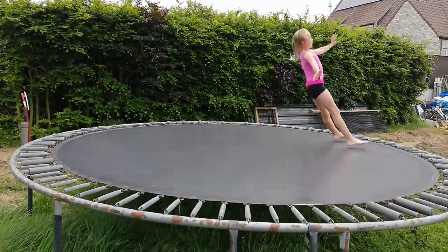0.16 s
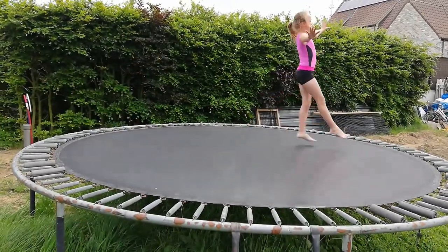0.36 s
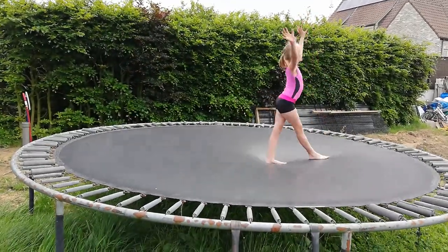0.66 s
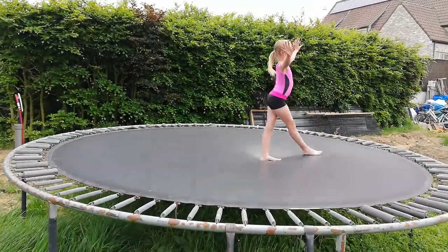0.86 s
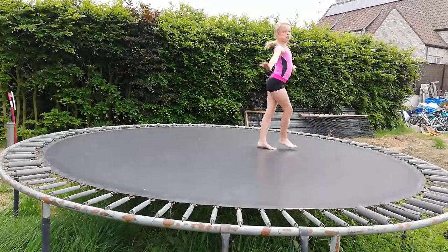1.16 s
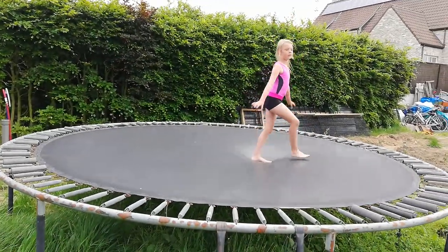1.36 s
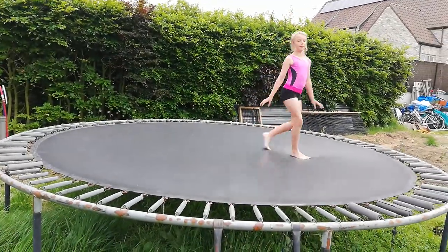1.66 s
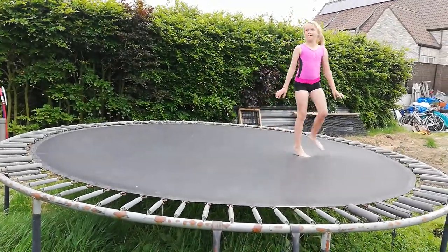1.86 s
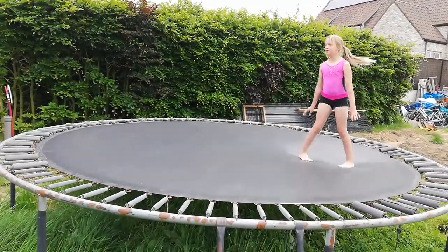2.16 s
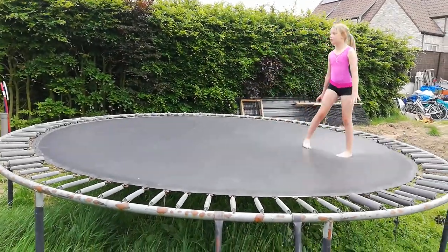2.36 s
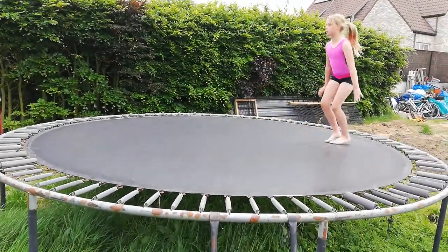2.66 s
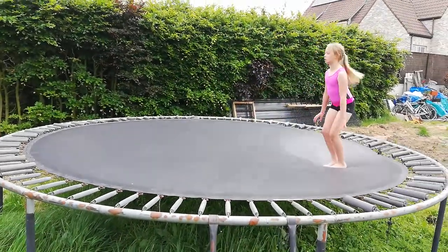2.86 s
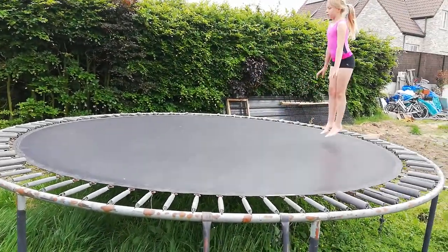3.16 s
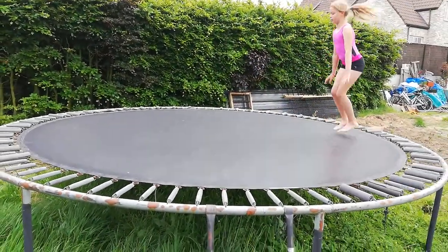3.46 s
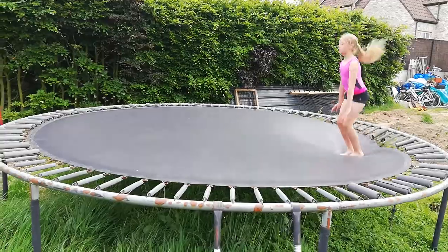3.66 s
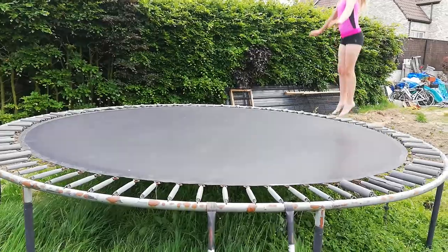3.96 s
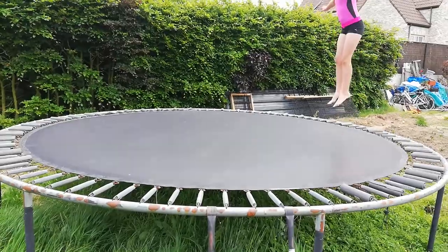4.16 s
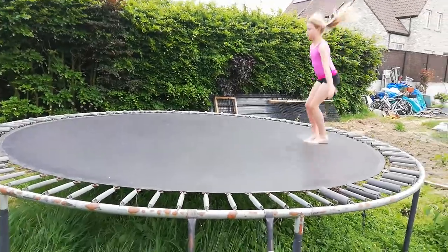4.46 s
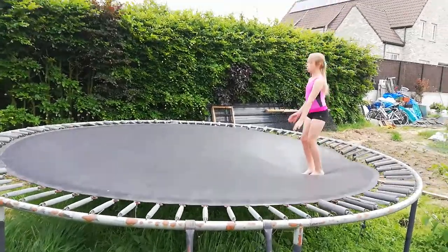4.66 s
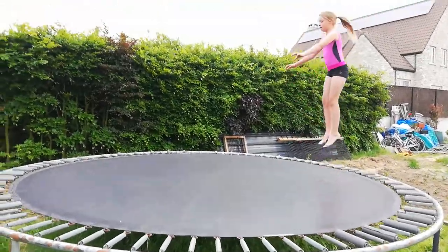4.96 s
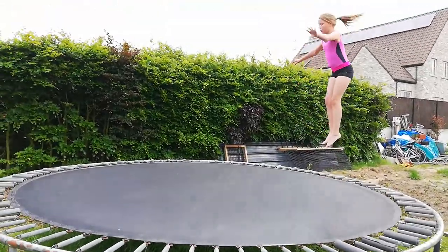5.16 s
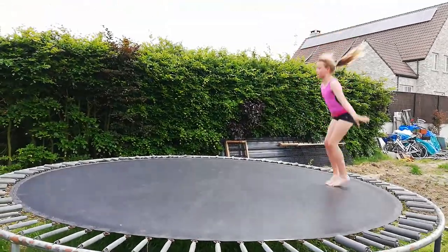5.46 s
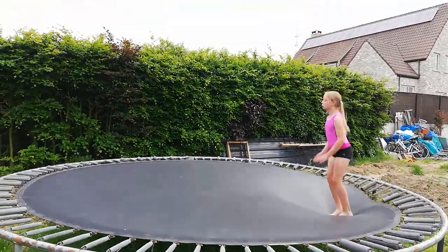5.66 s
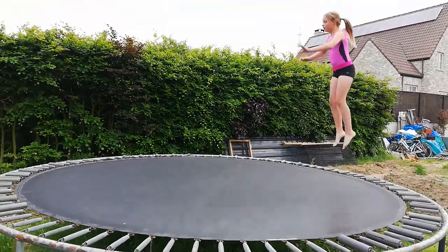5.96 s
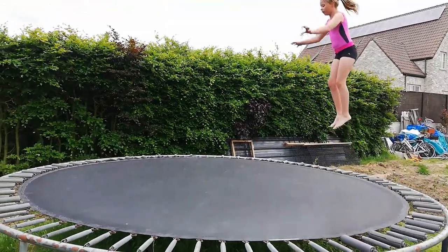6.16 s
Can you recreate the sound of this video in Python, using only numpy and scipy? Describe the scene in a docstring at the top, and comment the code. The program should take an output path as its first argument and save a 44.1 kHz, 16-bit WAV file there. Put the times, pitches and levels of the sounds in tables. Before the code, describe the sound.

In a breezy garden, trampoline springs rasp once, then give a few light metallic ticks while a distant bird whistles. The bouncing settles into a regular rhythm of scraping, ringing coils on the right. Wind buffets the microphone in uneven low bursts, building to a strong, popping gust near the end, just as the bird sings louder, gliding and trilling. Leaves and far traffic hiss quietly throughout.

```python
"""Garden trampoline in a breeze

A phone's stereo microphone stands in a gusty garden, a child bouncing on a trampoline to its right.
At each bounce the steel springs rasp, coil on coil, and slipping hooks tick and ring on the frame.
A songbird whistles in the hedge, also on the right, first from a farther perch, then a nearer one.
Wind eddies buffet the microphone ports; leaves and far traffic hiss behind."""
import sys
import numpy as np
from scipy import signal
from scipy.fft import rfft, irfft, next_fast_len
from scipy.io import wavfile
from scipy.ndimage import uniform_filter1d

SR = 44100
rng = np.random.default_rng(int(sys.argv[2]) if len(sys.argv) > 2 else 0)


def to_wav(sig):
    """Store sig (one row per channel, or 1-D mono) as 16-bit WAV at the path in sys.argv[1].

    Samples outside -1..1 are clipped; the rate is SR.
    """
    pcm = np.clip(np.atleast_2d(sig), -1, 1) * 32767
    pcm = np.round(pcm).astype(np.int16)
    wavfile.write(sys.argv[1], SR, pcm.T)  # frames by channels


N = 277830

# Modes of one coil spring: f/Hz, relative level/dB, t60/s
COIL_MODES = [(1252, -4, 0.098), (2752, 1, 0.15), (3307.4, -3, 0.15), (3455, -3.5, 0.94), (3500, -6, 0.27),
              (4720, 2.5, 0.089), (4760, -36, 0.063), (6420, -1.5, 0.056), (7830, -4, 0.079),
              (9000, -40, .06), (9420, -8.5, 0.19), (9880, -8, 0.15), (12300, -19, 0.055)]


def springs():
    """The trampoline, off to the right: springs rasp as the mat sinks and throws back; lone hooks tick."""
    # Strokes of the mat: t/s, swell/s, sag/s, first, peak and last level/dB, treble/dB, low clank/dB
    strokes = [(0.0, 0.0098, 0.058, -33.5, -32, -35.5, 2, 3), (.08, 0.011, 0.14, -41, -33, -43.5, -2, 6.5),
               (2.184, 0.094, 0.019, -45, -39.5, -45.5, 7.5, 4),
               (2.855, 0.031, 0.016, -47, -43, -44.5, 7, -6), (3.054, .01, 0.082, -48.5, -44.5, -46, 1, 8),
               (3.654, 0.054, 0.086, -47, -33, -44, 1.5, 3.5),
               (3.81, 0.027, 0.096, -39, -34, -42.5, 1.5, 0.5), (4.585, .095, .02, -41, -39, -40, 3, 2.5),
               (4.73, .035, .105, -41.5, -36.5, -47, 1.5, 4), (4.893, 0.0098, 0.074, -40, -38, -47, 5, 4.5),
               (5.6, 0.073, 0.039, -43.5, -31, -39.5, 6, 3.5),
               (5.73, .11, 0.0093, -39.5, -38, -41.5, 3.5, 6.5)]
    # Hook slips: t/s, scrape level/dB, scrape t60/s (capped at 0.6), treble/dB, ring level/dB, ring f/Hz
    hook_slips = [(0.0792, -37.5, 0.2, 17.5, -37, 3470), (0.3306, -39, 0.07, 6, -38.5, 3714),
                  (0.7125, -42, 0.087, 1, -43, 3440), (0.7615, -39, 0.11, 5.5, -39, 3500),
                  (1.4068, -47, 0.17, 2.5, -39.5, 3455), (1.5118, -45, 0.18, 4.5, -39, 3490),
                  (2.1886, -35, 0.09, -14, -34, 3490), (2.5046, -48, 0.08, 14.5, -54, 3420),
                  (2.8644, -41, 0.15, -4, -54, 3700), (3.1389, -45.5, 0.89, -21, -35, 3173),
                  (3.6472, -46.5, 0.14, 19.5, -56, 3420), (3.9054, -37, 0.13, 10, -49, 3400),
                  (3.9796, -45.5, 0.087, 14, -41, 3490), (4.0272, -40.5, 0.16, 7, -46, 3700),
                  (4.6445, -31.5, 0.13, -3, -39, 3350), (4.8196, -34, 0.16, 7, -60, 3330),
                  (4.8633, -43, 0.088, 14.5, -50.5, 3600), (4.8923, -51, 0.076, 8, -56, 3340),
                  (4.9594, -46.5, 0.06, 14, -50, 3260), (5.5547, -41.5, 0.087, 6, -40, 3404),
                  (5.592, -39, 0.12, 9, -30, 3920), (5.8967, -41, 0.29, 5, -40.5, 3690),
                  (5.9574, -40.5, 0.25, 9, -56, 3600), (6.0566, -54.5, 0.2, 17, -55, 3820)]
    out = np.zeros((2, N))
    for row in strokes:
        add(out, *spring_stroke(*row))
    for start, *slip in hook_slips:
        add(out, start - .003, hook_tick(*slip))
    return out + gain_of([[-17], [-13]]) * garden_echo(out[1], t60=0.2)


def spring_stroke(start, swell, sag, first_db, peak_db, last_db, treble_db, clank_db):
    """All the springs rasp together, swelling and sagging with the load. Returns onset time and sound."""
    attack_s, release_db_per_s = .015, 450
    length = swell + sag
    t = np.arange(-min(attack_s, start), length + 30 / release_db_per_s, 1 / SR)
    load_db = np.interp(t, [0, swell, length], [first_db, peak_db, last_db])
    clank_db = clank_db - 0.55 * (load_db - min(first_db, last_db))  # the low clank swells less
    judder_db = 1.6 * drift(len(t), .004)  # hooks catch and let go in clumps
    rasp = coil_rasp(len(t), ring_db=-2.5, grain_db=0.5, slips_per_s=350)
    rasp = place_steel(rasp, treble_db, clank_db)
    attack = np.minimum(1 + t / attack_s, 1) ** 2
    release = gain_of(-release_db_per_s * np.maximum(t - length, 0))
    return start + t[0], rasp * gain_of(load_db + judder_db) * attack * release


def hook_tick(scrape_db, scrape_t60, treble_db, ring_db, ring_hz):
    """A hook scrapes, then rattles on its seat; each knock rings three close modes of the coil."""
    knocks_per_s, rattle_t60, knock_t60 = 300, .35, .12
    t = np.arange(SR // 6) / SR
    scrape = coil_rasp(len(t), ring_db=-2.0, grain_db=-2.0, slips_per_s=600)
    scrape = place_steel(scrape, treble_db, clank_db=1.4)
    scrape *= gain_of(scrape_db - 60 * t / np.clip(scrape_t60, .03, .6))
    knocks = (rng.random(len(t)) < knocks_per_s / SR) * rng.standard_normal(len(t)) + (t == 0)
    knocks *= gain_of(-60 * t / rattle_t60)
    modes = COIL_MODES[2:5]
    ring = coil_ring(modes, detune=0.0048, spread_db=1.1, pitch=ring_hz / modes[1][0])
    ring *= gain_of(-60 * t / knock_t60)
    rattle = signal.fftconvolve(knocks / np.linalg.norm(knocks), ring)[:len(t)]
    rise = np.minimum(t / 0.0057, 1)
    return rise * (scrape + gain_of([[ring_db - 15], [ring_db]]) * rattle)


def coil_rasp(count, ring_db, grain_db, slips_per_s):
    """A dense rasp of coil on coil, and separate slips that each ring one of twelve springs."""
    # Spectrum of rubbing steel: f/Hz, relative density/dB
    rasp_spectrum = [(410, -22), (700, -13.5), (1060, -8), (1240, -3), (1410, -5), (1800, -8.5), (2080, -5),
                     (3360, -1), (4710, 0.5), (7040, -12), (9370, -10.5), (15500, -41.5)]
    grains = rng.standard_normal((2, count)) * gain_of(grain_db * rng.standard_normal(count))
    grains[0] += .45 * np.roll(grains[1], 24)  # the left microphone hears the frame a little later
    rasp = coloured(grains, lambda hz: db_at(rasp_spectrum, hz))
    rasp = unit_rms(shifting_strain(rasp, depth_db=3.5))
    slips = gain_of(0.87 * rng.exponential(1, (2, count))) * (rng.random((2, count)) < slips_per_s / SR)
    which_spring = rng.integers(0, 12, (2, count))
    ringing = np.zeros((2, count))
    for spring in range(12):
        ring = coil_ring(COIL_MODES, detune=0.0428, spread_db=5.0)
        ringing += signal.fftconvolve(slips * (which_spring == spring), ring[None], axes=1)[:, :count]
    return rasp + gain_of(ring_db) * unit_rms(ringing)


def coil_ring(modes, detune, spread_db, pitch=1.):
    """One struck spring: dying sines, each a little off the common pitch and strength."""
    t = np.arange(SR // 6) / SR
    ring = np.zeros(len(t))
    for hz, db, t60 in modes:
        off_pitch, off_level = rng.standard_normal(2)
        decay = gain_of(db + spread_db * off_level - 60 * t / t60)
        ring += decay * np.sin(2 * np.pi * hz * pitch * (1 + detune * off_pitch) * t)
    return ring


def shifting_strain(pair, depth_db):
    """Lifts and lowers drifting patches of the spectrum, as one coil after another takes the strain."""
    spectra = signal.stft(pair, nperseg=512, noverlap=384)[2]
    patches = rng.standard_normal(spectra.shape[1:])
    patches = uniform_filter1d(uniform_filter1d(patches, size=4, axis=0), size=9, axis=1)
    spectra *= gain_of(depth_db * unit_rms(patches))
    return signal.istft(spectra, nperseg=512, noverlap=384)[1][:, :pair.shape[1]]


def place_steel(pair, treble_db, clank_db):
    """Places the steel on the right and tilts its low and high ends."""
    # Stereo balance of the springs: f/Hz, left minus right/dB
    balance = [(60, -17), (150, 10), (380, -5), (950, 1.5), (2380, -5), (5980, -10), (15000, -25)]
    placed = panned(pair, balance)
    low = signal.sosfilt(signal.butter(2, 2000, fs=SR, output="sos"), placed)
    high = signal.sosfilt(signal.butter(2, 6800, "high", fs=SR, output="sos"), placed)
    return placed + (gain_of(clank_db) - 1) * low + (gain_of(treble_db) - 1) * high


def wind():
    """Pressure eddies buffet the right microphone port; the left gets them later and duller."""
    # Course of the gusts: t/s, buffeting level/dB, small eddies against large/dB
    gusts = [(0.0, -29.5, -17), (0.2, -42, -6), (0.45, -48, -13.5), (0.65, -46.5, -15), (1.0, -50.5, -8.5),
             (1.7, -61.5, -0.5), (1.77, -34.5, -28), (1.92, -30, -12.5), (2.23, -48, -17.5),
             (2.65, -41, -17), (2.91, -36, -17.5), (3.09, -54.5, -10), (3.12, -36, -17.5),
             (3.75, -52.5, -8.5), (3.79, -39, -19.5), (4.05, -40, -15.5), (4.35, -41, -23), (4.4, -27, -16),
             (4.53, -51, -8.5), (4.63, -35.5, -18), (4.7, -52, -18), (4.83, -34, -27), (4.91, -57, 3.5),
             (5.12, -31.5, -28.5), (5.203, -21.5, 4), (5.27, -26.5, -6.5), (5.4, -29.5, -8),
             (5.5, -33, -2.5), (5.59, -30, 1), (5.76, -49.5, -11.5), (6.3, -32.5, -23.5)]
    # Spectrum of the turbulence: f/Hz, relative density/dB
    turbulence = [(8.8, -82), (15, 3.5), (119, 1.5), (260, -8.5), (342, -14.5), (408, -15), (525, -19.5),
                  (639, -43), (704, -31.5), (1600, -41.5), (2080, -67), (3520, -120)]
    # Single eddies: t/s, swing level/dB, f/Hz, snap level/dB
    eddies = [(0.187, -27, 61, -46), (0.573, -33.5, 72, -57), (0.65, -33.5, 90, -53.5),
              (0.801, -35, 65, -55), (0.837, -33, 71, -54), (1.764, -22.5, 60.5, -51),
              (1.884, -18.5, 117, -30), (1.93, -35, 74, -25), (1.995, -35, 82.4, -46),
              (2.533, -25.5, 78, -59), (2.621, -39, 100, -52), (2.722, -33, 104, -53), (2.81, -30, 80, -55),
              (2.881, -26.5, 93, -45), (2.952, -30, 89, -55), (3.124, -34.5, 75, -57),
              (3.179, -25, 92, -35), (3.247, -31, 84, -55), (3.786, -27, 76, -52), (3.865, -26, 111, -59),
              (4.086, -23, 63, -47), (4.382, -17.5, 106, -22), (4.389, -19.5, 168, -41),
              (4.401, -20.5, 62.6, -50), (4.599, -30, 75, -40), (4.829, -28.5, 68.6, -55),
              (5.184, -26.5, 61.7, -13), (5.205, -19, 340, -5), (5.209, -19, 145, -8),
              (5.229, -34, 69.5, -21), (5.251, -11, 121, -18), (5.293, -19.5, 167, -28),
              (5.329, -16, 117, -18), (5.36, -18.5, 92, -25), (5.39, -28, 104, -70), (5.445, -21, 178, -24),
              (5.46, -35, 72, -20), (5.531, -18.5, 79, -18.5), (5.562, -22, 63, -16), (5.589, -22, 73, -23),
              (5.61, -22.5, 158, -25), (6.077, -29, 57, -34.5), (6.119, -19, 100, -45)]
    split_hz = 190  # large eddies lie below, small ones above
    times, *columns = np.transpose(gusts)
    level_db, sharp_db = (np.interp(np.arange(N) / SR, times, column) for column in columns)
    noise = rng.standard_normal((2, N))
    large = coloured(noise, lambda hz: db_at(turbulence, hz) - 12 * np.log2(1 + (hz / split_hz) ** 2))
    bursts = noise[0] * gain_of(4 * drift(N, .006))  # small eddies arrive in short bursts
    small = coloured(
        bursts, lambda hz: db_at(turbulence, hz) - 12 * np.log2(1 + (split_hz / (hz + 1)) ** 2))
    lumps = gain_of(5 * drift(N, .035))  # the pressure comes in lumps with lulls between
    large = gain_of(level_db) * unit_rms(large * lumps)
    right = large[0] + gain_of(level_db + sharp_db) * unit_rms(small)
    for at, db, hz, snap_db in eddies:
        phase, tone = rng.random(2)
        add(right, at + 0.00326 - 1 / hz, eddy_pop(db, hz, snap_db, phase, snap_hz=300 + 370 * tone))
    left = coloured(np.roll(right, 35), lambda hz: -11.5 * np.clip(hz / 1100, 0, 1)) + 0.3 * large[1]
    return np.array([left, right])


def eddy_pop(db, hz, snap_db, phase, snap_hz):
    """One eddy passing the port: a single pressure swing with a short snap on its leading edge."""
    t = np.arange(-1.5, 1.5, hz / SR) / hz
    swing = np.exp(-4 * (t * hz) ** 2) * np.cos(2 * np.pi * (t * hz + phase))
    edge_t = t + .4 / hz
    snap = np.exp(-(edge_t / .0013) ** 2) * np.cos(2 * np.pi * (edge_t * snap_hz + phase))
    return gain_of(db) * swing + gain_of(snap_db) * snap


def songbird():
    """Near-pure gliding whistles from the hedge, some trilled; the far perch gives less direct sound."""
    # Notes: start t/s, end t/s, first, middle and last f/Hz, first and last relative level/dB,
    # trill depth/Hz, first and last trill rate/Hz
    notes = [(0.258, 0.291, 2570, 2200, 1955, -57, -51, 0, 30, 30),
             (0.396, 0.54, 2310, 2310, 2330, -64, -61, 0, 30, 30),
             (.64, 0.75, 2495, 2560, 2570, -70, -60, 0, 30, 30),
             (0.712, 0.968, 1676, 1834, 1820, -58.5, -55, 50, 30, 29.2),
             (0.997, 1.255, 2450, 2442, 2447, -52.5, -66, 77, 40, 41.6),
             (1.295, 1.322, 2590, 2374, 2200, -64, -63, 0, 30, 30),
             (1.327, 1.46, 2240, 2270, 2250, -65, -64, 0, 30, 30),
             (1.56, 1.588, 2710, 2620, 2540, -61, -61, 0, 30, 30),
             (1.65, 1.747, 2210, 2214, 2240, -57, -51, 4, 30, 30),
             (4.672, 4.754, 1980, 1877, 1840, -50, -41, -2, 30, 30),
             (4.904, 4.964, 1817, 1908, 1980, -50, -39.5, 181, 52, 56),
             (4.961, 4.993, 2290, 2234, 2140, -39.5, -37.5, 0, 30, 30),
             (5.029, 5.207, 2520, 2667, 2624, -47, -39.5, 18, 30, 30.6),
             (5.188, 5.384, 2517, 2054, 1900, -35.5, -40, 184, 55.64, 22.2),
             (5.778, 5.983, 2408, 2112, 1905, -43.5, -42, 128, 41, 32)]
    near_from_s, flick_share = 3, .3  # each trill cycle flicks up for this share, then slides down
    near, far = np.zeros((2, N))
    for start, end, first_hz, mid_hz, last_hz, first_db, last_db, depth_hz, *trill_rates in notes:
        t = np.arange(0, end - start, 1 / SR)
        glide = np.polyval(np.polyfit([0, .5, 1], [first_hz, mid_hz, last_hz], 2), t / t[-1])
        trill_phase = 2 * np.pi * np.cumsum(np.geomspace(*trill_rates, len(t))) / SR
        hz = glide + depth_hz * signal.sawtooth(trill_phase, flick_share) + 14 * drift(len(t), 0.0052)
        waver_db = 1.1 * drift(len(t), 0.015)  # moving air makes the level waver
        level = gain_of(np.linspace(first_db, last_db, len(t)) + waver_db)
        note = level * np.sin(2 * np.pi * np.cumsum(hz) / SR) * signal.windows.tukey(len(t), .2)
        add(far if start < near_from_s else near, start, note)
    song = near + gain_of(-2) * far
    direct = np.array([gain_of(-9.0) * np.roll(song, 12), gain_of(7.5) * song])
    return direct + gain_of([[-3], [1.5]]) * garden_echo(near + far)


def leaves_and_traffic():
    """Leaves and far traffic: smooth hiss with drifting patches, partly shared by both microphones."""
    # Spectrum of the background: f/Hz, relative density/dB
    hiss_spectrum = [(24, -58), (40, 0), (129, -20.5), (183, -15), (350, -11), (622, -17.5), (1050, -9.5),
                     (1650, -15.5), (2580, -14), (2780, -17.5), (3230, -15.5), (6820, -15), (8540, -20.5),
                     (9670, -20.5), (15500, -44)]
    # Its stereo balance: f/Hz, left minus right/dB
    balance = [(60, 7), (180, 3.5), (550, 0), (1650, -2.5), (4970, -2.5), (15000, -12.5)]
    frames, hz = N // 256 + 5, np.fft.rfftfreq(1024, 1 / SR)
    left_re, left_im, own_re, own_im, patches = rng.standard_normal((frames, 513, 5)).T
    patches = unit_rms(uniform_filter1d(uniform_filter1d(patches, 12, 0), 14, 1))
    coherence = 0.21 + .5 * np.exp(-hz / 400)[:, None]  # the two sides are most alike in the bass
    left = left_re + 1j * left_im
    right = coherence * left + np.sqrt(1 - coherence ** 2) * (own_re + 1j * own_im)
    spectra = np.array([left, right]) * gain_of(db_at(hiss_spectrum, hz)[:, None] + 1.53 * patches)
    pair = signal.istft(spectra, nperseg=1024, noverlap=768)[1][:, :N]
    level_db = -53 + .5 * drift(N, .3)
    return gain_of(level_db) * panned(pair, balance)


def garden_echo(x, t60=.42):
    """Echoes off hedge and walls: sparse taps of random sign dying away."""
    delays = np.arange(300, SR // 2, 20)
    taps = np.zeros((2, SR // 2 + 20))
    echoes = rng.choice([-1., 1.], (2, len(delays))) * gain_of(-60 * delays / SR / t60)
    np.put_along_axis(taps, delays + rng.integers(0, 20, echoes.shape), echoes, 1)
    return signal.fftconvolve(x[None], taps / np.linalg.norm(taps[0]), axes=1)[:, :N]


def gain_of(db):
    """Decibels to amplitude."""
    return 10 ** (np.asarray(db) / 20)


def unit_rms(x):
    """Scales to rms 1."""
    return x / np.sqrt(np.mean(x ** 2) + 1e-20)


def db_at(table, hz):
    """Interpolates a table of f/Hz, level/dB along log frequency."""
    table_hz, db = np.transpose(table)
    return np.interp(np.log(hz + 1), np.log(table_hz + 1), db)


def add(mix, start, sound):
    """Mixes a sound in from start, in seconds."""
    part = mix[..., round(start * SR):][..., :sound.shape[-1]]
    part += sound[..., :part.shape[-1]]


def coloured(x, db_of):
    """Filters by a dB rule of frequency."""
    size = next_fast_len(x.shape[-1] + 512)
    response = gain_of(db_of(np.fft.rfftfreq(size, 1 / SR)))
    return irfft(rfft(x, size) * response, size)[..., :x.shape[-1]]


def drift(count, span_s):
    """A random wander of rms 1, smoothed over span_s."""
    size = max(round(span_s * SR), 2)
    return unit_rms(uniform_filter1d(uniform_filter1d(rng.standard_normal(count), size), size))


def panned(pair, balance):
    """Shades one microphone against the other and scales their mean to rms 1."""
    out = coloured(pair, lambda hz: db_at(balance, hz) * np.array([[.5], [-.5]]))
    return out / np.sqrt(np.mean(out.mean(0) ** 2))


def scene():
    """The garden as it reaches the left and right microphones."""
    return springs() + wind() + songbird() + leaves_and_traffic()


def record(dry):
    """The phone loses the deepest bass, eases its gain down under strong gusts and cuts the top treble."""
    threshold_db, recovery_db_per_s, top_hz = -29.0, 36.0, 15650
    heard = signal.sosfilt(signal.butter(1, 42, "high", fs=SR, output="sos"), dry)
    power_db = 10 * np.log10(abs(uniform_filter1d((heard ** 2).mean(0), 2000)) + 1e-12)
    fall_db = np.arange(N) * recovery_db_per_s / SR
    held_db = np.maximum.accumulate(power_db + fall_db) - fall_db  # the detector holds peaks, then falls
    over_db = np.maximum(held_db - threshold_db, 0)
    ducked = heard / gain_of(0.41 * uniform_filter1d(over_db, 800))
    lowpass = signal.firwin(511, top_hz, window=("kaiser", 9), fs=SR)
    return signal.oaconvolve(ducked, lowpass[None], "same")


dry = scene()
out = record(dry)
to_wav(out)
```